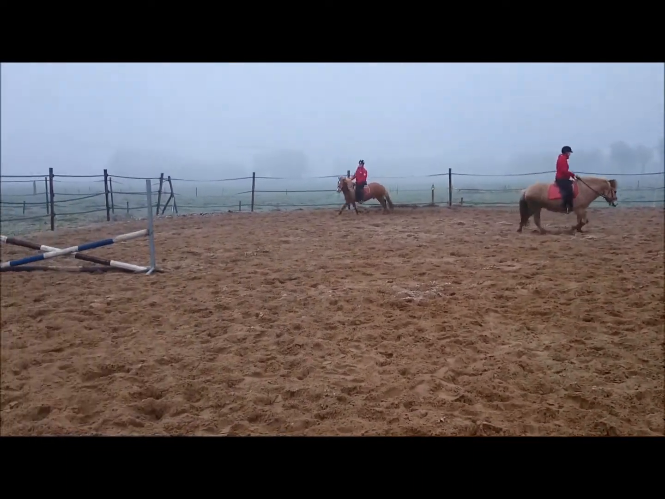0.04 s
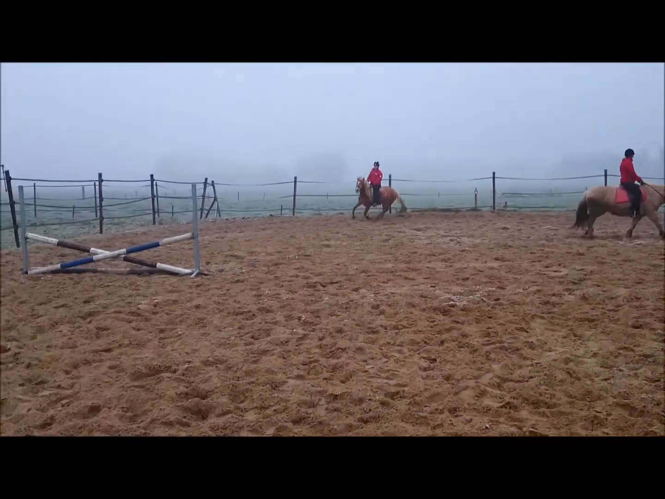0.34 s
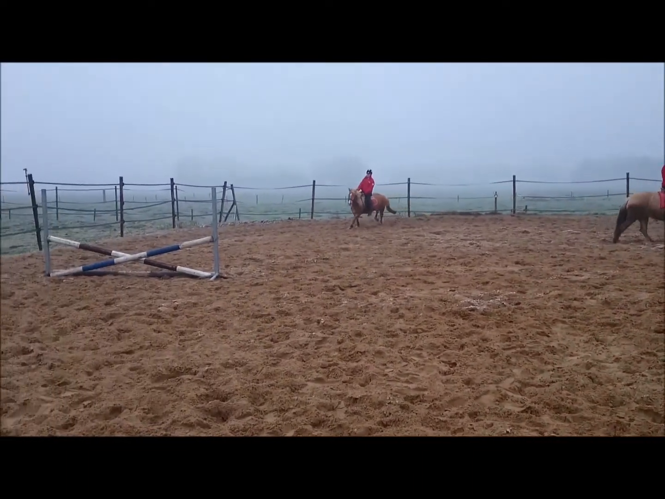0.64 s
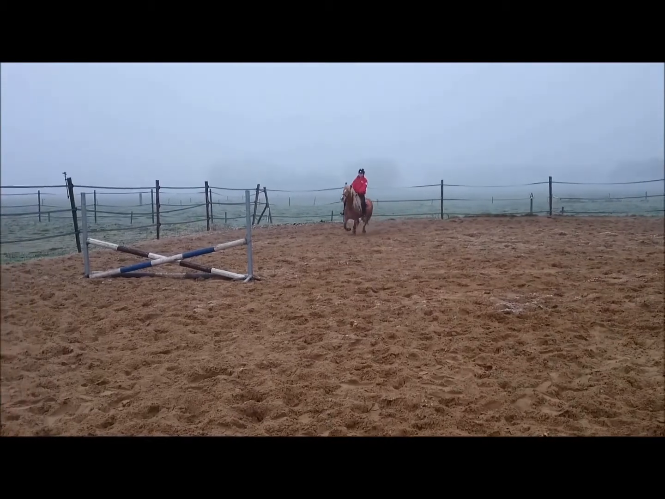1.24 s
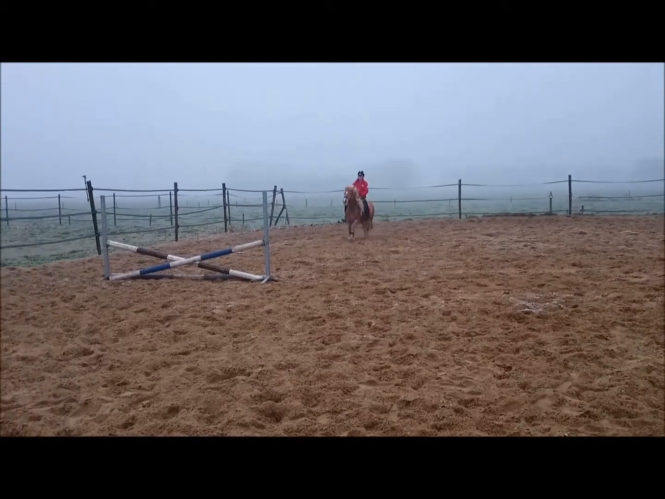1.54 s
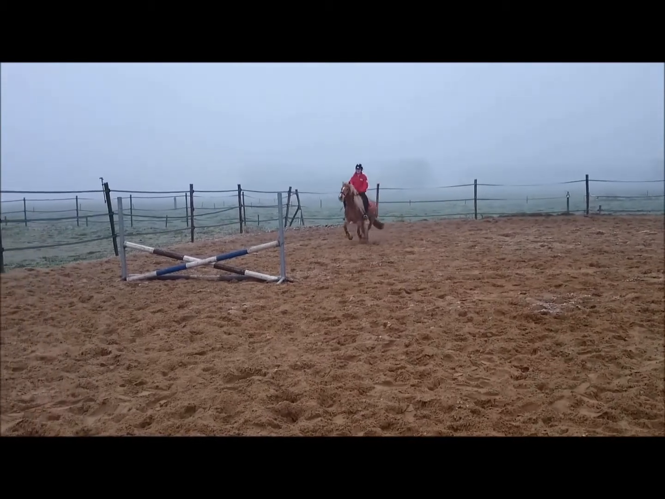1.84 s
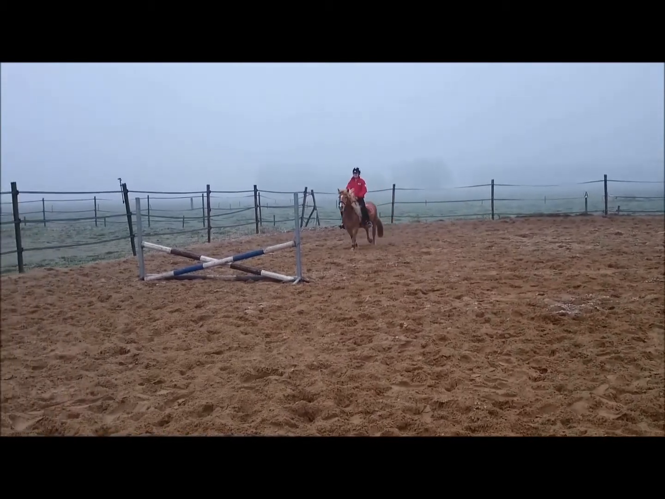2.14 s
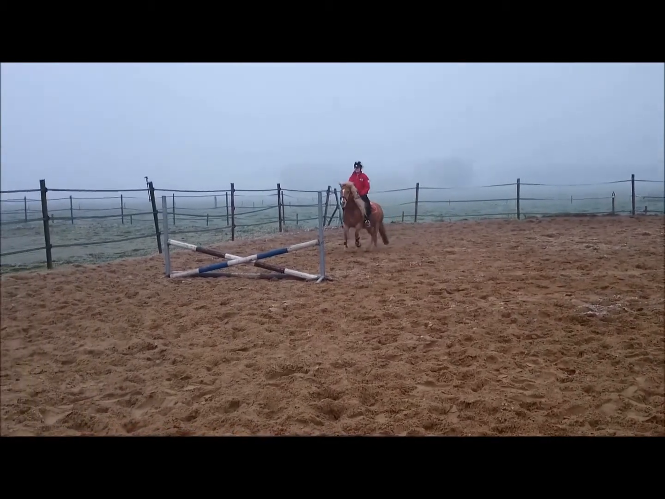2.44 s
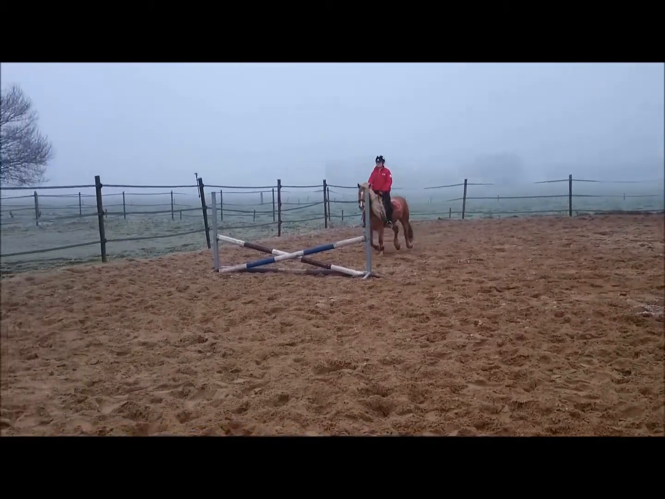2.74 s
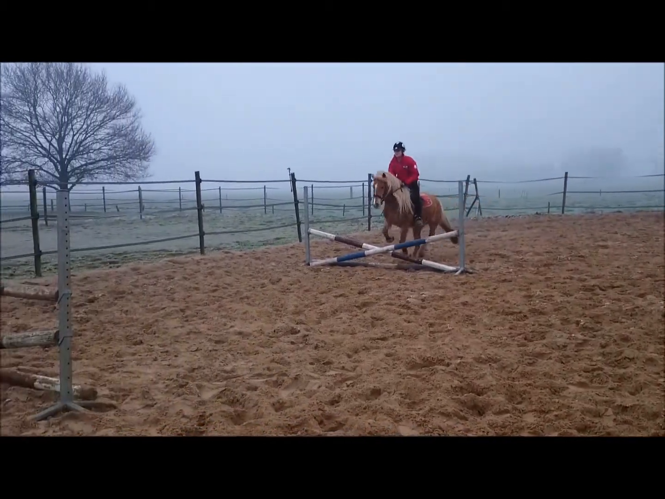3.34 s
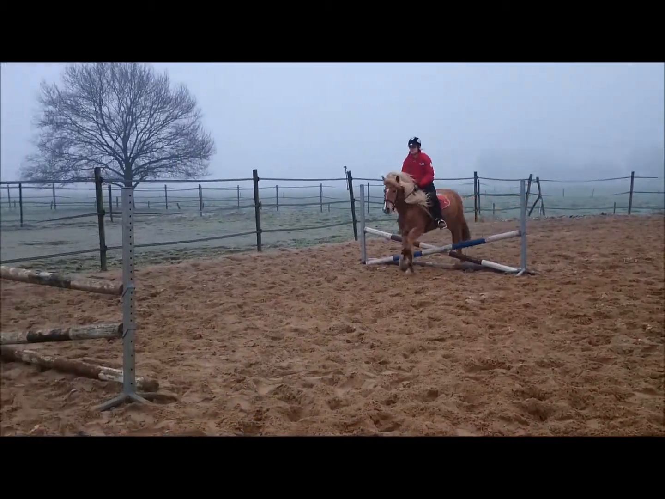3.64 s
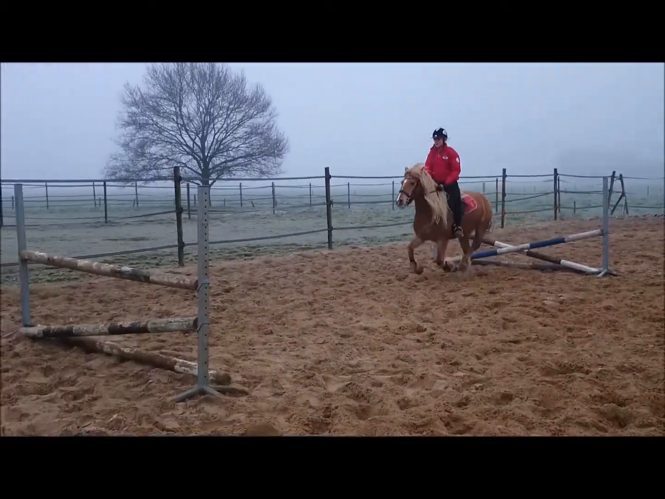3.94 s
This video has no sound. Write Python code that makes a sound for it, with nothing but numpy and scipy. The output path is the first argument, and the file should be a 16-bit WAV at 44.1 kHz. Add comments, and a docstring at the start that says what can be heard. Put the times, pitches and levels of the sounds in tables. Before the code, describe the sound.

Gusty wind rumbles on the microphone, then eases as a horse's hooves thud closer.

```python
"""Wind buffets each microphone port on its own, over the soft steps of a horse cantering up a sand arena.
The wind dies down before the horse takes a small jump. As it nears, its hooves thud on the ground,
crunch the grains and spray loose sand, louder and louder. A few small ticks sound close by,
over a quiet outdoor hush. The left port rings in the treble."""
import sys
import numpy as np
from scipy.fft import rfft, irfft, next_fast_len
from scipy.io import wavfile
from scipy.ndimage import map_coordinates

SR = 44100
rng = np.random.default_rng(int(sys.argv[2]) if len(sys.argv) > 2 else 0)


def put_to_file(sound):
    """Save the sound as 16-bit audio at rate SR, in the file named by the first command-line argument."""
    columns = np.atleast_2d(sound).T  # one column per channel
    safe = np.clip(columns, -1, 1)
    whole_steps = np.round(safe * 32767)
    wavfile.write(sys.argv[1], SR, whole_steps.astype(np.int16))


N = 176400

# Hooves hitting the ground: start_s, level_db
HOOF_HITS = [(1.69, -43), (2.584, -42.5), (2.723, -49), (2.968, -46.5), (3.122, -46.5), (3.14, -48),
             (3.323, -46.5), (3.554, -49.5), (3.73, -32.5), (3.812, -45), (3.887, -40.5)]
# The ground's low notes: pitch_hz, level_db, fade_s (time to fall 60 dB)
GROUND_NOTES = [(61, 4.5, 0.11), (129, 3.5, 0.063), (209, -1.5, 0.042), (306, -6.5, 0.04)]
# The puff's colour (how strong its lows and highs are): pitch_hz, level_db
PUFF_COLOUR = [(40, -4), (130, 9), (280, -5), (4000, -115)]
def thuds(rise_s=0.0071, puff_db=-14, puff_fade_s=0.13, left_db=-0.5):
    """Each hoof gives the damped ground one low push, with a dull puff."""
    out, t = np.zeros(N + SR), np.arange(SR // 4) / SR
    tunings = 1 + 0.11 * rng.standard_normal((len(HOOF_HITS), len(GROUND_NOTES)))
    for (start_s, db), tuning in zip(HOOF_HITS, tunings):
        push = 0
        for k, (hz, note_db, fade_s) in enumerate(GROUND_NOTES):
            note = (-1) ** k * np.sin(2 * np.pi * hz * tuning[k] * t)
            push += amp(note_db - 60 * t / fade_s) * note
        out[round(start_s * SR):][:len(t)] += amp(db) * push * (1 - np.exp(-t / rise_s))
    puffs = sum(amp(db + puff_db) * burst(s + 0.0031, rise_s, puff_fade_s) for s, db in HOOF_HITS)
    return amp([[left_db], [0]]) * (out[:N] + puffs * noise(PUFF_COLOUR))


# Sand crushed under a hoof: peak_s, level_db, rise_s, fade_s, knock_db (added to level_db)
CRUNCHES = [(1.591, -64.5, 0.0039, 0.051, -5), (2.591, -67.5, 0.0079, 0.23, -3),
            (3.231, -63.5, 0.012, 0.16, -2.5), (3.615, -53, 0.0021, 0.11, -20),
            (3.69, -64.5, 0.0059, 0.038, -12), (3.734, -59, 0.0017, 0.074, 5),
            (3.814, -59.5, 0.0063, 0.076, 6.5), (3.924, -58.5, 0.016, 0.086, -18)]
# Loose sand thrown up by the hooves: time_s, level_db
SPRAY = [(0, -82), (.85, -78.5), (1.6, -79), (2.33, -74.5), (3.0, -76), (3.14, -73.5), (3.45, -68),
         (3.56, -76.5), (3.62, -68.5), (3.93, -65.5)]
# Colours of the crunch, knock and spray: pitch_hz, level_db
CRUNCH_COLOUR = [(500, -17.5), (1450, -1.5), (2500, -2.5), (5500, -16.5), (15000, -21)]
KNOCK_COLOUR = [(150, -4.5), (420, -1.5), (660, -0.5), (1050, -12), (8000, -84)]
SPRAY_COLOUR = [(300, -17.5), (1800, 4.5), (4000, -2), (13000, -9.5), (15500, -15)]
def sand(crack_db=1, crack_fade_s=0.0093):
    """A hoof lands with a crack: grains crunch, packed sand knocks and loose sand sprays."""
    crush, crack, knock = np.zeros((3, N))
    for peak_s, db, rise_s, fade_s, knock_db in CRUNCHES:
        crush += amp(db) * burst(peak_s, rise_s, fade_s)
        crack += amp(db + crack_db) * burst(peak_s, rise_s / 2, crack_fade_s)
        knock += amp(db + knock_db) * burst(peak_s, rise_s, fade_s)
    spray = amp(curve(SPRAY) + 1.8 * wobble(25))
    grains = np.zeros((2, N))
    for side in grains:
        side += crush * grit(CRUNCH_COLOUR, per_s=2200, spread_db=6.0)
        side += spray * grit(SPRAY_COLOUR, per_s=2500, spread_db=4.0)
    return grains + crack * noise(CRUNCH_COLOUR) + knock * noise(KNOCK_COLOUR)


# Steps farther away: peak_s, level_db
FAR_STEPS = [(.04, -70), (.56, -69), (1.125, -65.5), (1.34, -70.5), (1.84, -72.5), (2.32, -69.5)]
def scuffs(half_length_s=0.038):
    """Farther hooves drag softly through the sand."""
    loudness = sum(amp(db) * hump(peak_s, half_length_s) for peak_s, db in FAR_STEPS)
    return loudness * np.array([noise(CRUNCH_COLOUR), noise(CRUNCH_COLOUR)])


# Wind on each port, and a slow swell of pressure on the right one: time_s, level_db
WIND_LEFT = [(0, -53), (.16, -49), (.2, -37.5), (.53, -35.5), (.72, -49), (.88, -32.5), (1.76, -56),
             (1.84, -44), (2.3, -40.5), (2.72, -57.5), (2.86, -63), (3.7, -62)]
WIND_RIGHT = [(0, -42.5), (.18, -44.5), (.36, -40), (.47, -56), (.95, -47), (1.16, -45.5), (1.26, -55),
              (1.48, -45.5), (1.76, -63.5), (2.06, -49.5), (2.17, -62.5), (2.53, -47), (2.66, -60.5),
              (3.7, -60)]
SWELL = [(0, -47), (.2, -34), (.9, -42), (2.35, -39), (2.7, -46)]
# Their colours: pitch_hz, level_db
LEFT_COLOUR = [(8, -20.5), (25, 0), (80, -3), (130, -14.5), (200, -21), (450, -46), (2500, -120)]
RIGHT_COLOUR = [(12, -15.5), (28, 1), (130, -3.5), (300, -27), (450, -43), (2500, -115)]
SWELL_COLOUR = [(2, -15), (8, -1.5), (50, -27), (200, -120)]
def wind(left_db=5.5, right_db=4.5, swell_db=8.5):
    """Air churns at each port (microphone opening); the right one also feels slow puffs."""
    left = amp(left_db) * buffet(WIND_LEFT, LEFT_COLOUR, gap_s=.026, roar_db=0.5, flutter_db=5.5)
    right = amp(right_db) * buffet(WIND_RIGHT, RIGHT_COLOUR, gap_s=.022, roar_db=1.5, flutter_db=0.5)
    swell = amp(swell_db + curve(SWELL) + 0.55 * wobble(9)) * noise(SWELL_COLOUR)
    return np.array([left, right + swell])


def buffet(levels, colour, gap_s, roar_db, flutter_db, flurry_hz=144):
    """Churning air bumps one port over a smoother roar; above flurry_hz it comes in flurries."""
    gaps, sizes, signs = rng.random((600, 3)).T
    bump_samples = (np.cumsum(gap_s * 2 * gaps) * SR).astype(int)
    bumps = np.bincount(bump_samples, (.5 + sizes) ** 2 * np.sign(signs - .5), N)[:N]
    air = unit(unit(coloured(bumps, colour)) + amp(roar_db) * noise(colour))
    low = filtered(air, lambda hz: 1 / (1 + (hz / flurry_hz) ** 4))
    flurries = unit(amp(flutter_db * wobble(45)))
    return amp(curve(levels)) * (low + flurries * (air - low))


# Single swirls of air hitting a port: peak_s, level_db, half_length_s, port (L or R)
SWIRLS = [(0.028, -22, 0.0031, "R"), (0.065, -36.5, 0.0018, "R"), (0.086, -23, 0.0045, "R"),
          (0.224, -22.5, 0.0036, "L"), (0.256, -30.5, 0.0024, "R"), (.305, -23, 0.0047, "L"),
          (.333, -26, 0.0035, "R"), (0.445, -17.5, 0.0039, "L"), (.538, -32.5, 0.0018, "L"),
          (0.55, -17.5, 0.0064, "L"), (0.801, -30, 0.0024, "R"), (0.831, -30.5, 0.0021, "L"),
          (.914, -26, 0.0022, "R"), (1.154, -26.5, .003, "R"), (1.924, -34, 0.0032, "R"),
          (2.058, -27, 0.0027, "R"), (2.31, -25.5, 0.007, "R"), (2.357, -24.5, 0.0061, "R"),
          (2.517, -30.5, 0.004, "R"), (2.781, -36, 0.0093, "R"), (3.783, -25.5, 0.011, "R")]
# Colour of their ruffling noise: pitch_hz, level_db
RUFFLE_COLOUR = [(120, 4.5), (330, 1), (650, -23), (3000, -110)]
def swirls(ruffle_s=0.0066, ruffle_db=-23):
    """Each swirl is one rounded, ruffled swing of pressure: short ones slap, long ones push."""
    out, ruffle = np.zeros((2, N)), amp(ruffle_db) * noise(RUFFLE_COLOUR)
    for (peak_s, db, half_length_s, port), phase in zip(SWIRLS, rng.random(len(SWIRLS))):
        t = clock() - peak_s
        swing = np.real(np.exp(2j * np.pi * phase) / (1 - 1j * t / half_length_s) ** 3)
        out["LR".index(port)] += amp(db) * (swing + ruffle * hump(peak_s, ruffle_s))
    return out


# Small close ticks: start_s, level_db, body_db (added to level_db)
TICKS = [(.297, -61, -10), (.348, -61, -16), (.868, -47.5, -26), (.8717, -65, -22), (.874, -58, -17),
         (1.39, -55, 4), (1.454, -59, -15), (2.004, -66, 7.5), (2.0345, -61, -6), (3.065, -58, -9),
         (3.622, -69, -15)]
# Colours of their bright snap and lower body: pitch_hz, level_db
SNAP_COLOUR = [(1500, -27), (5500, 4.5), (9300, 7.5), (13000, -13)]
BODY_COLOUR = [(400, -18), (1200, 17), (5000, 9), (15000, -20)]
def ticks(click_db=9, rise_s=0.0003, rattle_db=-9, fade_s=0.022):
    """Dry little clicks near the microphone: one sharp snap and a brief rattle."""
    snap, body = np.zeros((2, 2, N))
    for start_s, db, body_db in TICKS:
        click = amp(rattle_db) * burst(start_s, rise_s, fade_s) * rng.standard_normal((2, N))
        click[:, round(start_s * SR)] += amp(click_db)
        snap += amp(db) * click
        body += amp(db + body_db) * click
    return coloured(snap, SNAP_COLOUR) + coloured(body, BODY_COLOUR)


# High swishes: peak_s, level_db, half_length_s
SWISHES = [(1.368, -59, 0.054), (3.45, -66, 0.061), (3.935, -60, 0.055)]
# Their colour: pitch_hz, level_db
SWISH_COLOUR = [(2000, -72), (8500, 4.5), (13000, 5.5), (14500, 12.5)]
def swishes(gain_db=-4):
    """Brief, thin hisses swell and fade."""
    loudness = sum(amp(db + gain_db) * hump(peak_s, half_s) for peak_s, db, half_s in SWISHES)
    return loudness * np.array([noise(SWISH_COLOUR), noise(SWISH_COLOUR)])


# The outdoor hush: time_s, level_db
HUSH = [(0, -71), (1.55, -73.5), (2.0, -72.5), (2.9, -75), (4, -71.5)]
# Its colour at each port: pitch_hz, level_db
HUSH_LEFT = [(200, 6.5), (400, 8), (1000, 2), (2500, -6), (4000, -10.5), (6300, -18), (8200, -11.5),
             (10800, -16.5), (15500, -23.5)]
HUSH_RIGHT = [(200, 9.5), (500, 3.5), (1700, -5), (4000, -10.5), (8200, -16.5), (15500, -21)]
def hush(left_db=5.5, right_db=9, waver_db=1.16):
    """The soft, slightly wavering air of open fields."""
    loudness = amp(curve(HUSH) + waver_db * wobble(11))
    return loudness * np.array([amp(left_db) * noise(HUSH_LEFT), amp(right_db) * noise(HUSH_RIGHT)])


def amp(db):
    """Turns decibels into a number to multiply by."""
    return 10 ** (np.asarray(db) / 20)


def unit(x):
    """Scales x to an average power of 1."""
    return x / np.sqrt(np.mean(x ** 2) + 1e-20)


def clock():
    """The time of every sample, in seconds."""
    return np.arange(N) / SR


def curve(rows):
    """Joins (time_s, value) points with straight lines."""
    return np.interp(clock(), *np.transpose(rows))


def wobble(per_s):
    """A smooth curve through per_s random points a second."""
    return map_coordinates(rng.standard_normal(int(N * per_s / SR) + 4), [clock() * per_s])


def burst(peak_s, rise_s, fade_s):
    """Swells to 1 at peak_s, then falls 60 dB in fade_s."""
    t = clock() - peak_s
    return np.exp(np.maximum(np.where(t < 0, t / rise_s, -np.log(1000) * t / fade_s), -40))


def hump(peak_s, half_length_s):
    """A bell-shaped rise and fall."""
    return np.exp(-((clock() - peak_s) / half_length_s) ** 2)


def filtered(x, gain_at):
    """Turns each pitch in x up or down by gain_at(hz)."""
    size = next_fast_len(N + 16384)
    return irfft(rfft(x, size) * gain_at(np.fft.rfftfreq(size, 1 / SR)), size)[..., :N]


def coloured(x, colour):
    """Shapes the lows and highs of x with a colour table."""
    pitch_hz, db = np.transpose(colour)
    return filtered(x, lambda hz: amp(np.interp(np.log(hz + 1), np.log(pitch_hz + 1), db)))


def noise(colour):
    """Smooth, steady noise."""
    return unit(coloured(rng.standard_normal(N), colour))


def grit(colour, per_s, spread_db):
    """Tiny grain hits of uneven size."""
    hits = (rng.random(N) < per_s / SR) * rng.choice([-1, 1], N)
    sizes = amp(spread_db * rng.standard_normal(N))
    return unit(coloured(hits * sizes, colour))


# How each port shapes the treble: pitch_hz, gain_db
PORT_LEFT = [(1000, 1), (3500, -11), (6800, 0.5), (8200, 8.5), (11000, -5), (12800, 8), (14500, -23)]
PORT_RIGHT = [(1000, -0.5), (3500, -2.5), (6000, -3.5), (8500, -10.5)]
def scene():
    """The crisp sounds take on each port's colour; thuds, wind and hush join them."""
    left, right = sand() + scuffs() + swishes() + ticks()
    crisp = np.array([coloured(left, PORT_LEFT), coloured(right, PORT_RIGHT)])
    return crisp + thuds() + wind() + swirls() + hush()


def record(dry, top_hz=15700):
    """Cuts away everything above top_hz."""
    return filtered(dry, lambda hz: hz < top_hz)


dry = scene()
out = record(dry)
put_to_file(out)
```